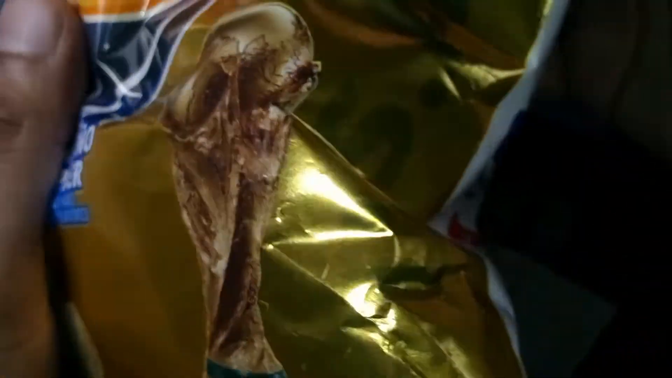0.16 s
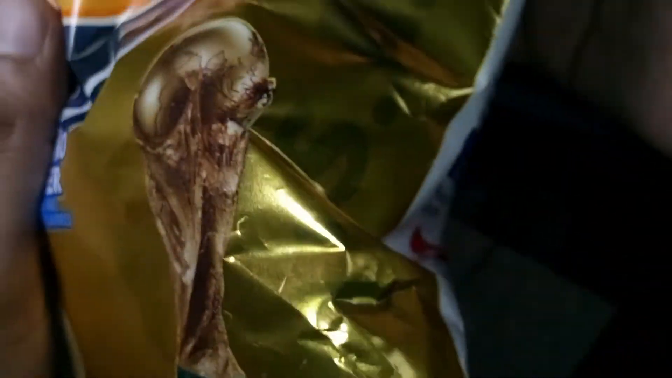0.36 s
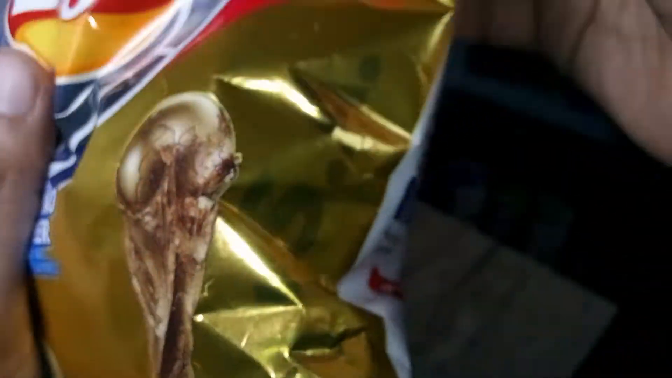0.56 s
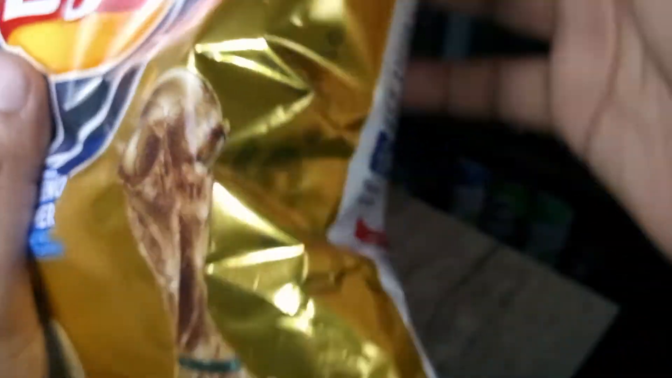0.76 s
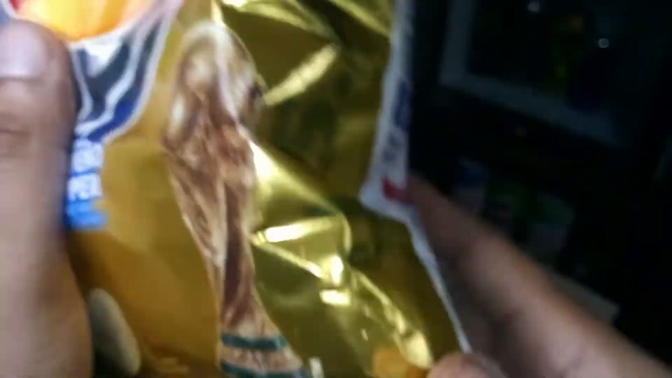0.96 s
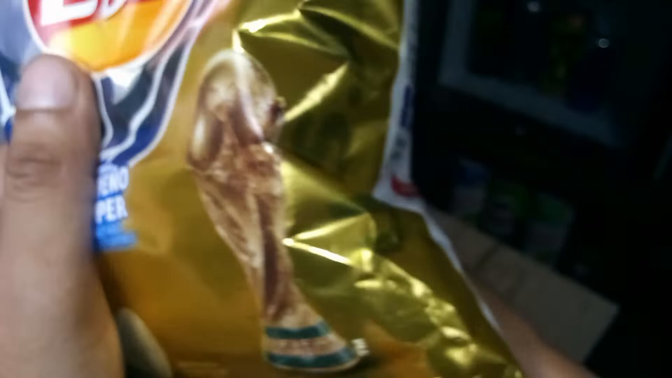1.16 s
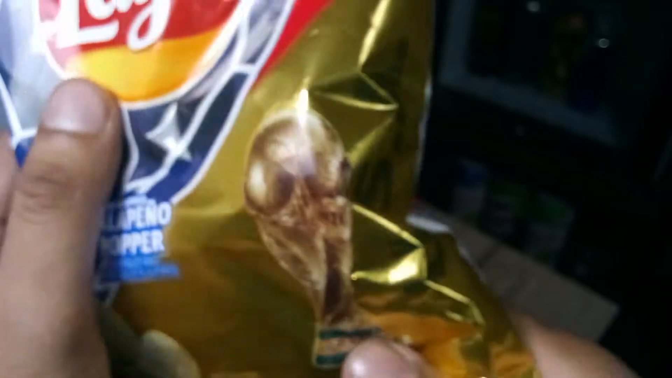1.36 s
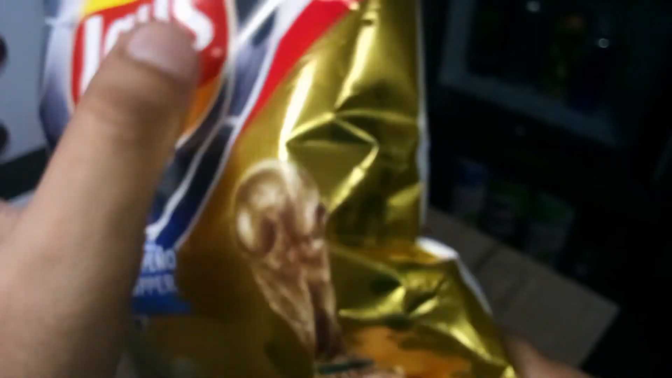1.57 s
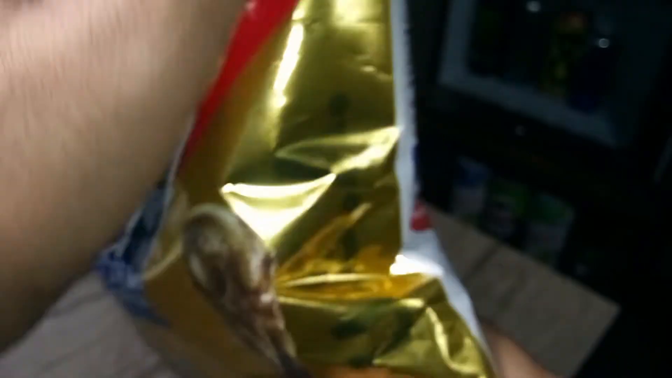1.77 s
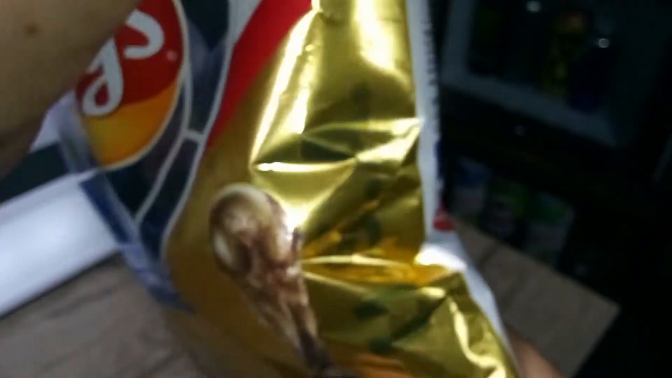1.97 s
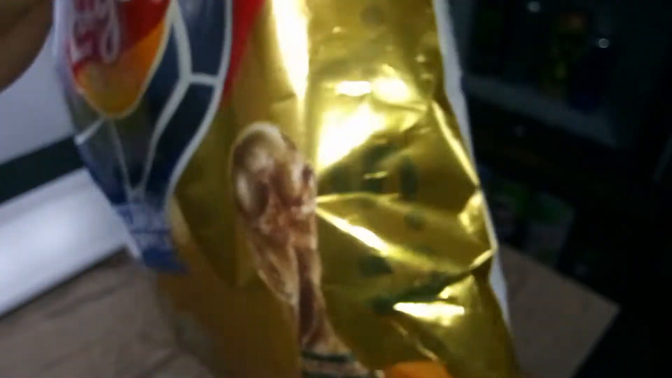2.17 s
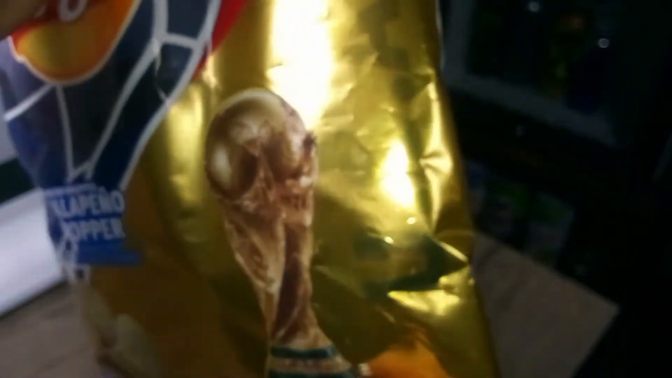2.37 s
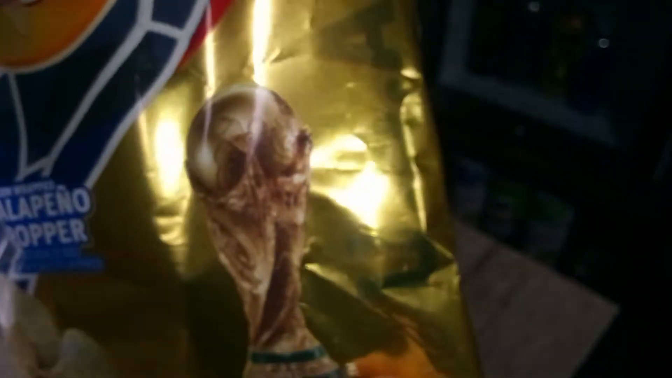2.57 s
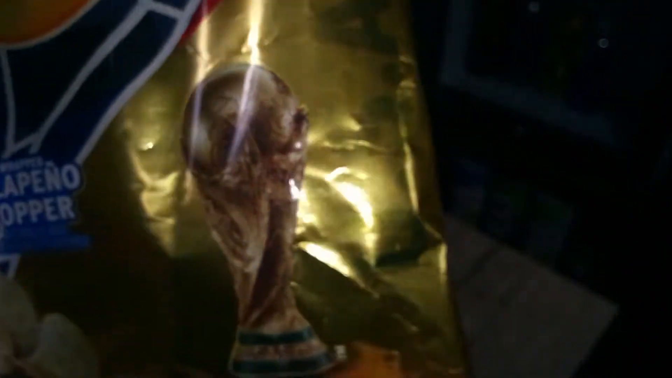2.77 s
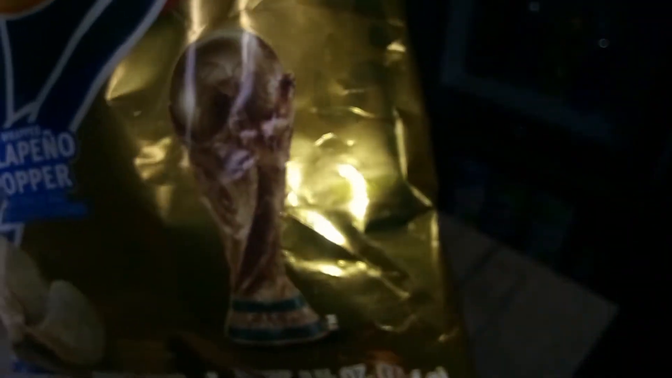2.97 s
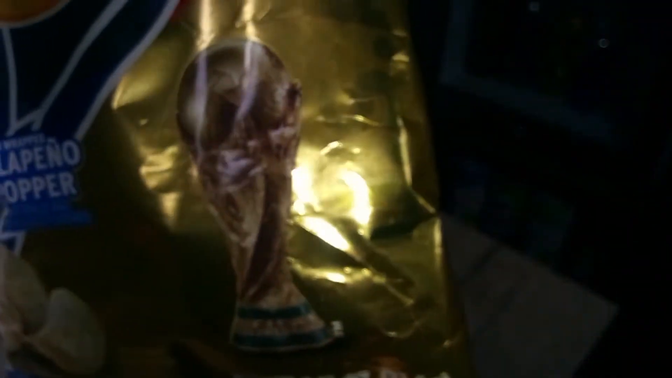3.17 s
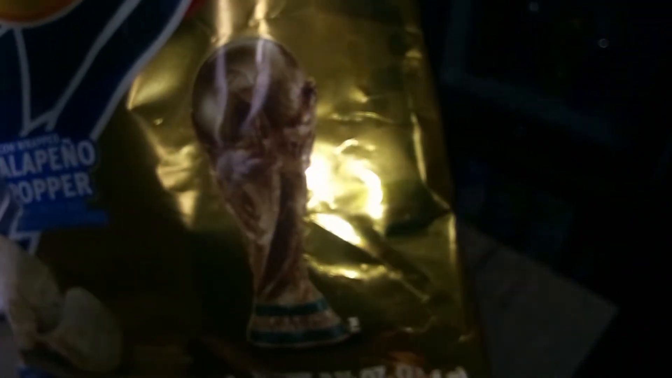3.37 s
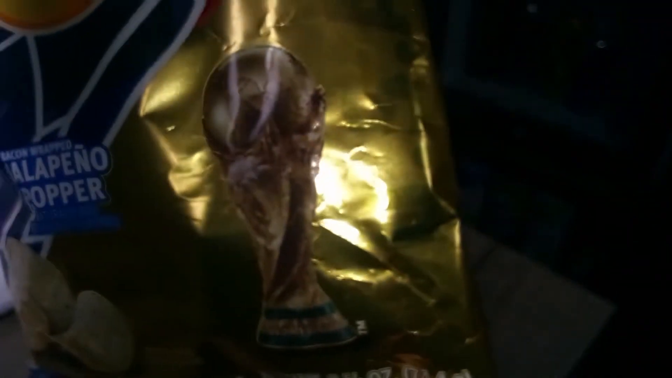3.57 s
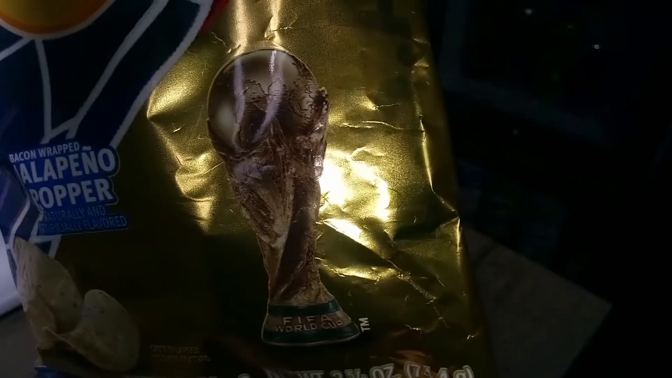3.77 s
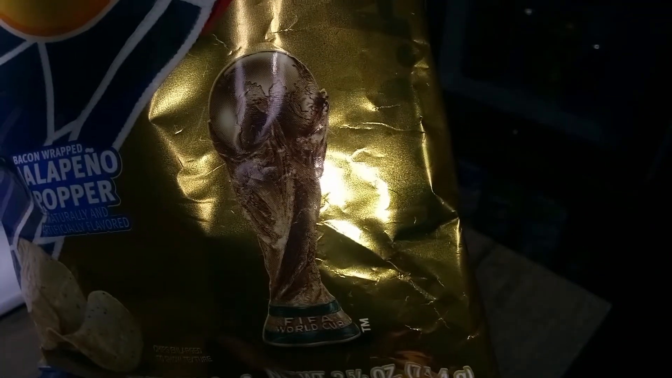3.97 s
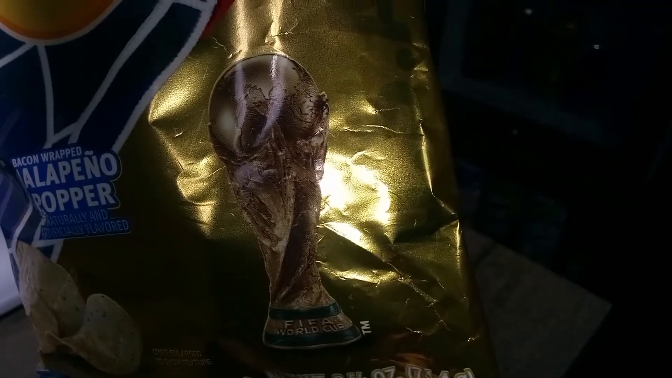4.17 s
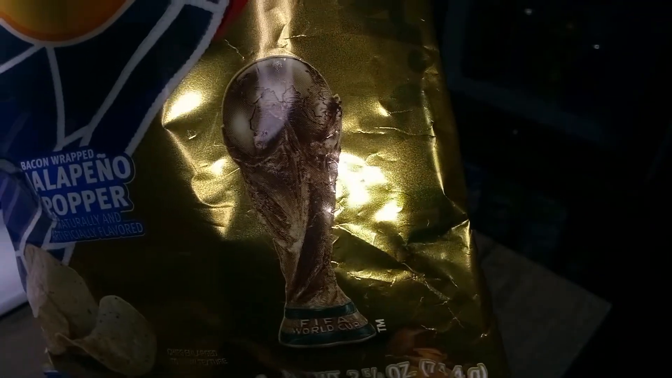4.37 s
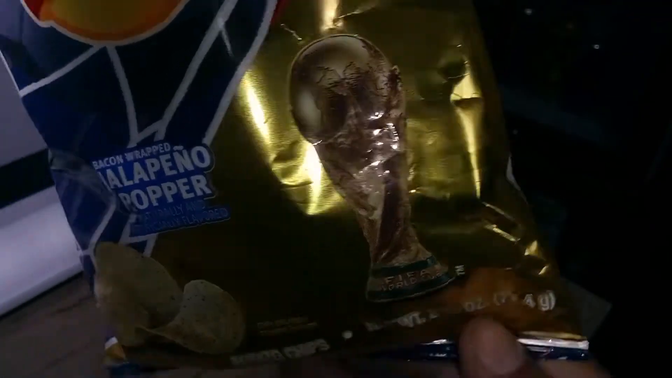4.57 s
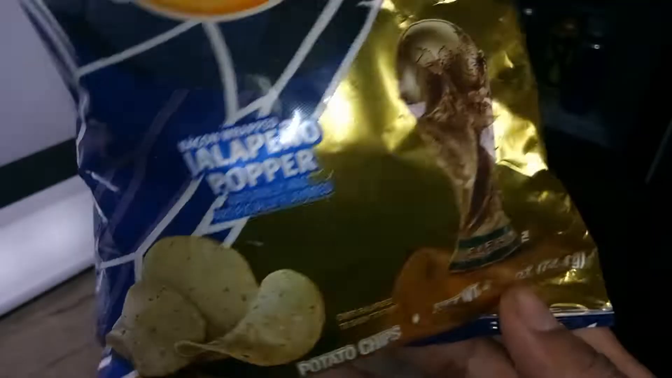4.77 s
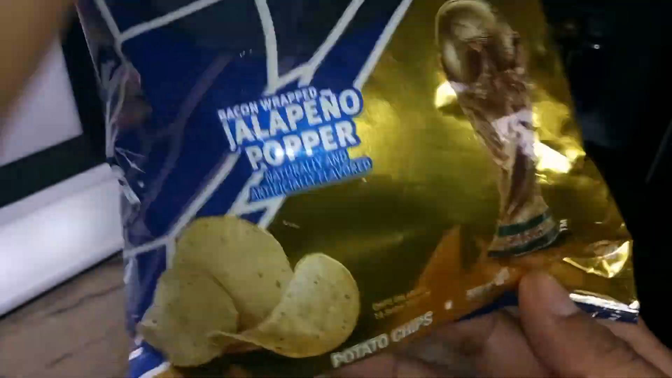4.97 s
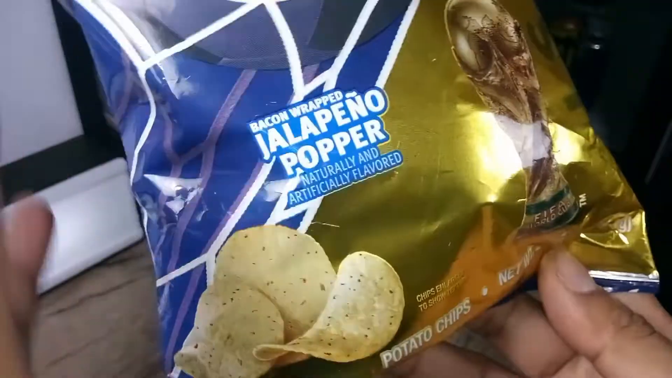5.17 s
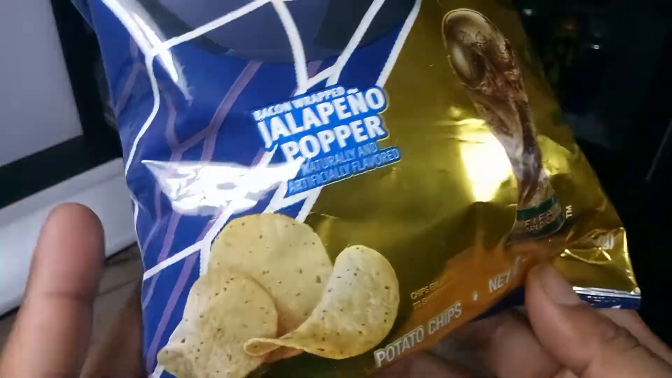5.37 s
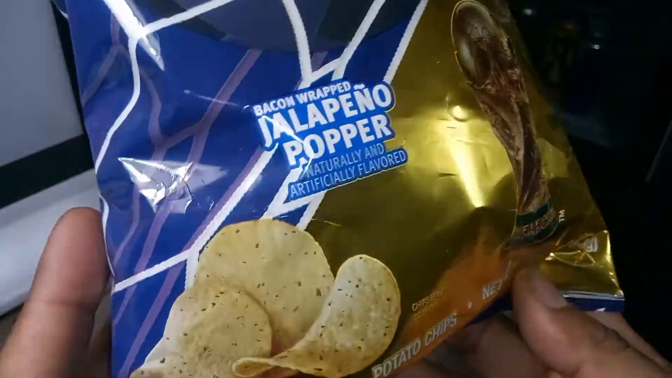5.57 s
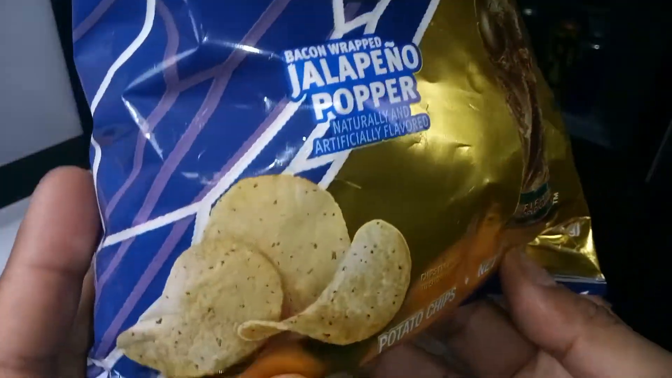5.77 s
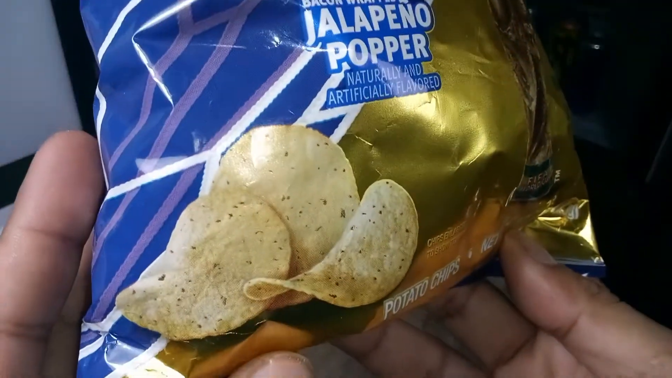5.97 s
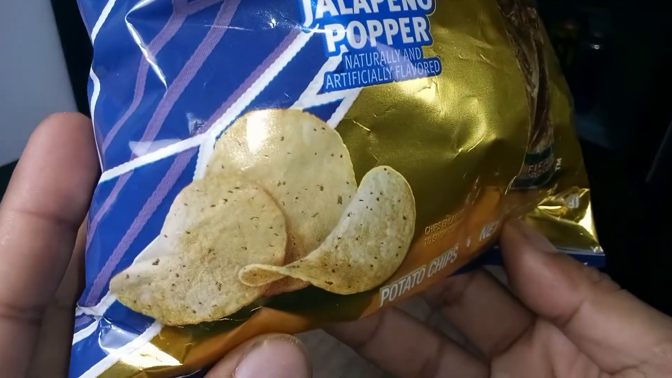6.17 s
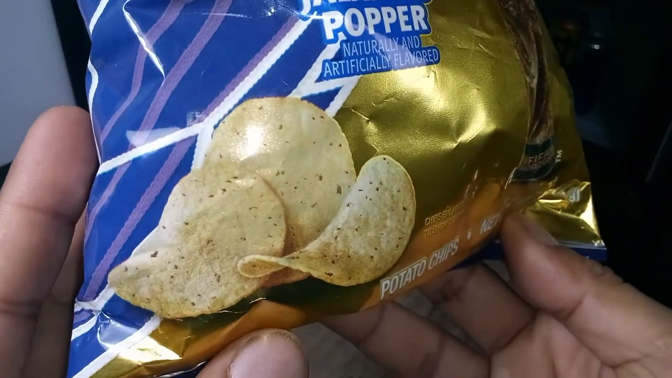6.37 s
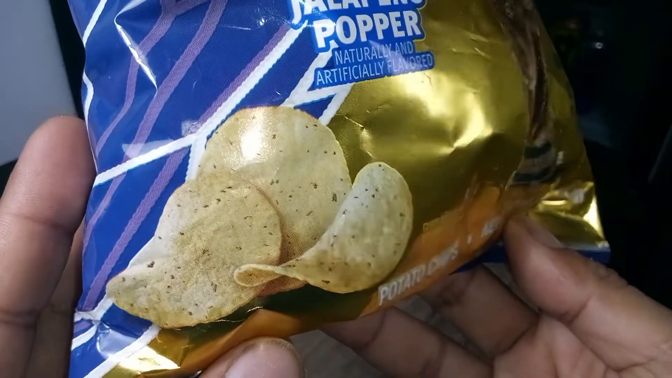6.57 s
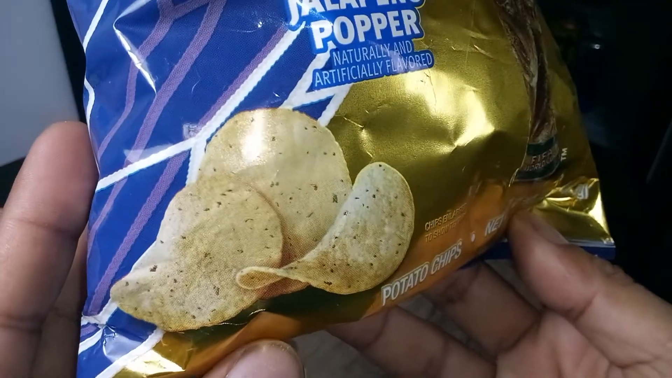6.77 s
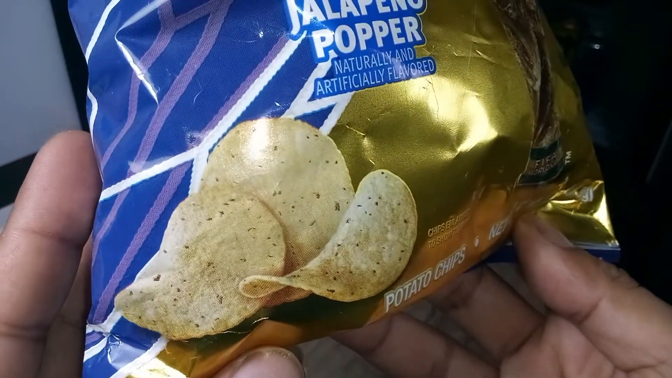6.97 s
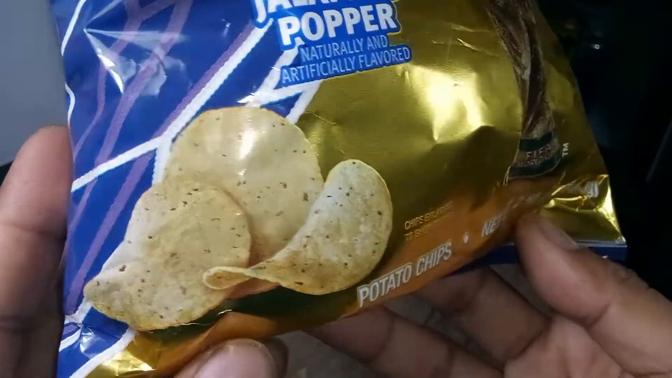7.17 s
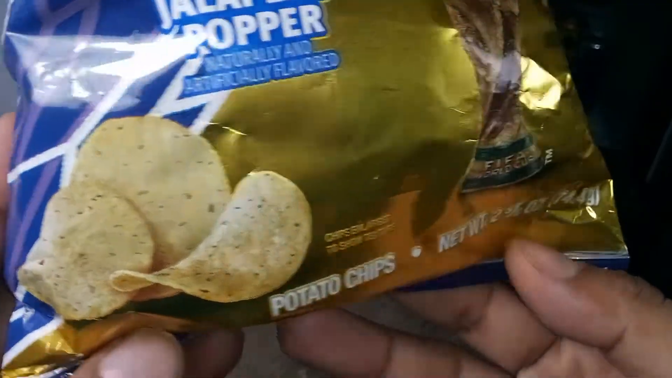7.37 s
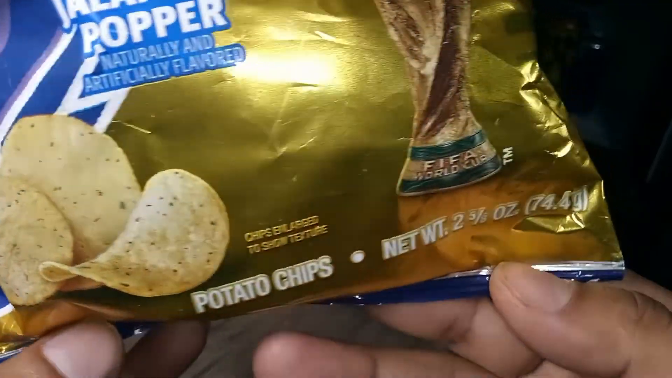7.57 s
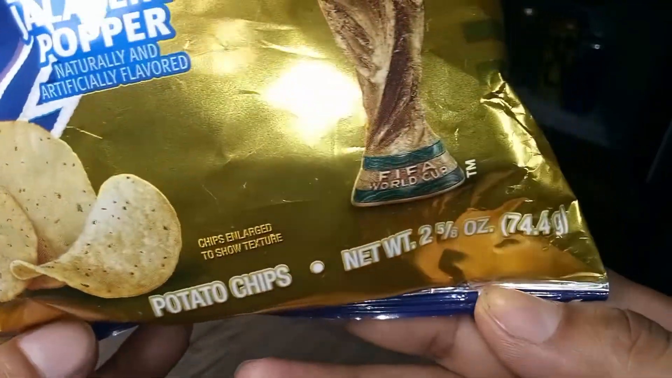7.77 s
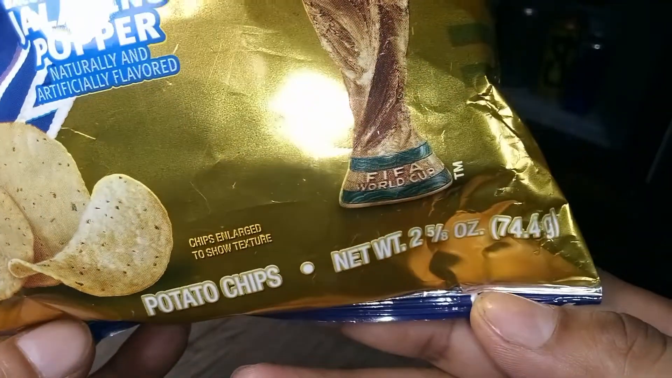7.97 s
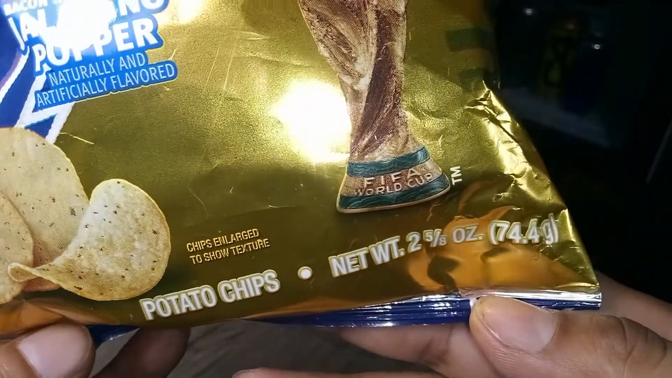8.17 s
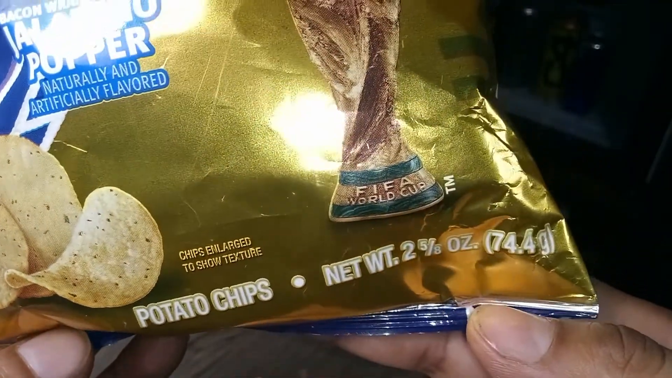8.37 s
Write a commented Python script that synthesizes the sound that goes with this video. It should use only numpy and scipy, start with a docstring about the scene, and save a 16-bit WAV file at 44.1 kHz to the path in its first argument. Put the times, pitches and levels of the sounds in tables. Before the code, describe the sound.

Close, crisp crinkling of a stiff foil packet being turned over, with sharp snaps and hollow pops, broken by near-silent gaps with low room hum.

```python
"""Foil-lined snack bag in the hands

A snack bag is turned over close to the microphone in a small quiet room. Creases snap as noise impulses
ringing through resonators; random small buckles and rubbing make the crackle, panel flexing and air thuds.
The air cavity and short reflections colour them, and between bursts a low hum and thin whine remain."""
import sys
import numpy as np
from scipy import signal
from scipy.fft import rfft, irfft
from scipy.io import wavfile
from scipy.ndimage import uniform_filter1d

SR = 44100
rng = np.random.default_rng(int(sys.argv[2]) if len(sys.argv) > 2 else 0)


def master(y):
    """Save y as 16-bit WAV."""
    cut = np.clip(np.atleast_2d(y).T, -1, 1)
    pcm = np.round(cut * 32767)  # scale
    wavfile.write(sys.argv[1], SR, pcm.astype(np.int16))


N = 370881
TIME = np.arange(N) / SR


def from_db(db):
    """Decibels to amplitude gain: 20 dB is a factor of ten."""
    return 10 ** (np.asarray(db) / 20)


def rms_one(x):
    """Normalise the effective (root-mean-square) amplitude to 1."""
    return x / np.sqrt(np.mean(x ** 2) + 1e-20)


def at_hz(points, hz):
    """Interpolate a table on a logarithmic frequency axis."""
    known_hz, values = np.transpose(points)
    return np.interp(np.log(np.maximum(hz, 1)), np.log(known_hz), values)


def drift(per_s):
    """Slow random modulation: a new normal value per_s times a second, joined by straight lines."""
    values = rng.standard_normal(2000)
    return np.interp(TIME * per_s, np.arange(len(values)), values)


def resonate(x, hz, q):
    """Two-pole resonance with gain 1 at its centre; a higher q rings longer."""
    w = 2 * np.pi * min(hz, SR / 2 - 1000) / SR
    damping = np.sin(w) / (2 * q)
    numerator = [damping, 0, -damping]
    denominator = [1 + damping, -2 * np.cos(w), 1 - damping]
    return signal.lfilter(numerator, denominator, x + 1e-18)


def colour(x, points):
    """Minimum-phase filtering: folding the cepstrum makes a causal filter of the given response."""
    size = 8192
    bins_hz = np.arange(size // 2 + 1) * SR / size
    cepstrum = irfft(np.log(from_db(at_hz(points, bins_hz))))
    cepstrum[1:size // 2] *= 2
    cepstrum[size // 2 + 1:] = 0
    impulse_response = irfft(np.exp(rfft(cepstrum)))
    return signal.fftconvolve(x, impulse_response)[:N]


def snaps(rows, q):
    """Snap-through buckling: a crease flips, rings its facet and leaves the film shivering."""
    swell_s, swell_db = 0.0029, -25
    shiver_s, shiver_db = 0.017, -28
    edge_db, wall_db = -17, -8
    lead = SR // 200   # samples before the flip
    t = TIME[:SR // 25] - lead / SR
    distance_s = np.abs(t)
    out = np.zeros(N + len(t))
    for s, level_db, hz, flip_s in rows:
        # a hard first crack, then the rest of the flip, then the shiver
        crack = np.exp(-distance_s / (0.12 * flip_s))
        flip = np.exp(-distance_s / flip_s)
        shiver = from_db(shiver_db) * np.exp(-distance_s / shiver_s)
        rise = 1 - np.exp(-4 * distance_s / flip_s)
        # a faint noise swells before the flip and fades after it
        swell = from_db(swell_db) * np.exp(-distance_s / swell_s)
        envelope = swell + (t > 0) * rise * (crack + flip + shiver)
        force = rng.standard_normal(len(t)) * envelope
        ring = rms_one(resonate(resonate(force, hz, q), hz, q))
        # the sharper the tuning, the less broadband edge
        snap = ring + from_db(edge_db) / (1 + q * q) * rms_one(force)
        # the far wall of the bag echoes it, from a different distance each time
        lag = int(SR * rng.uniform(.0005, .0022))
        echo = np.pad(snap, (lag, 0))[:len(t)]
        snap = rms_one(snap + from_db(wall_db) * echo)
        start = max(round(s * SR) - lead, 0)
        # the level counts all the energy as if within one millisecond
        out[start:start + len(t)] += from_db(level_db) * snap * np.sqrt(SR / 1000 / len(t))
    return out[:N]


def lesser_snaps(wrinkle_db):
    """Random point process: smaller creases give way oftener and louder under a firm grip."""
    firmest_per_s, rate_follows = 45, 0.33   # rate under the firmest grip; share of the grip's dB it follows
    firmest_db, level_follows, spread_db = -26.5, 0.75, 4   # likewise for level, with its scatter
    centre_hz, spread_octaves, flip_s = 2400, .8, 0.00062
    slots = np.arange(0, N, SR // 200)
    chance = rng.random(len(slots))
    size, pitch = rng.standard_normal((len(slots), 2)).clip(-2, 2).T
    grip_db = wrinkle_db[slots] - wrinkle_db.max()
    per_s = firmest_per_s * from_db(rate_follows * grip_db)
    level_db = firmest_db + level_follows * grip_db + spread_db * size
    ring_hz = centre_hz * 2 ** (spread_octaves * pitch)
    rows = np.transpose([TIME[slots], level_db, ring_hz, np.full(len(slots), flip_s)])
    return rows[chance < per_s * TIME[slots[1]]]


def creases(wrinkle_db):
    """Impulsive radiation of buckling creases; q sets how clearly each kind rings."""
    # single crease snaps, from loud cracks to faint ticks:
    # start_s, level_db (over one millisecond), ring_hz, flip_s
    crease_snaps = [(0.0422, -24.5, 1420, 0.00074), (0.162, -27, 1000, 0.00032), (0.2535, -24, 1340, .002),
                    (0.3508, -31, 1340, 0.0005), (0.4319, -17, 1510, .0005), (0.5092, -21, 3275, 0.0011),
                    (0.5277, -26.5, 1340, 0.00045), (0.607, -17.5, 840, 0.0016),
                    (0.6343, -19, 2410, 0.0013), (0.6491, -20.5, 1510, 0.0013), (0.7354, -22, 1060, 0.0012),
                    (0.7916, -27.5, 710, .003), (0.8225, -25.5, 3420, 0.00075), (0.8443, -28, 3220, 0.0021),
                    (0.9035, -41, 2020, 0.00056), (0.9798, -25, 2710, 0.00094), (1.0078, -25.5, 500, .0005),
                    (1.049, -22.5, 3620, 0.0025), (1.095, -22, 9000, 0.00062), (1.118, -20.5, 710, 0.0018),
                    (1.1693, -19.5, 1000, 0.0031), (1.248, -28, 1700, 0.0012), (1.2824, -24, 950, 0.0042),
                    (1.409, -21.5, 2270, 0.0009), (1.426, -20, 2550, 0.00024), (1.5227, -20, 440, .001),
                    (1.6268, -23.5, 950, 0.0021), (1.6428, -18.5, 1060, 0.002), (1.7066, -23, 2140, 0.0013),
                    (1.8155, -27, 1130, 0.0016), (1.9435, -21.5, 840, .0012), (2.1567, -22, 350, 0.00092),
                    (2.2002, -24.5, 6890, 0.00031), (2.2865, -18, 1420, 0.0015),
                    (2.3578, -31.5, 5460, .0014), (2.3829, -29.5, 630, .0008),
                    (2.4294, -24.5, 1800, 0.0021), (2.453, -25, 2410, 0.00055), (2.6102, -46, 630, 0.00082),
                    (2.7478, -27.5, 1910, 0.0026), (2.9008, -22.5, 2710, 0.00077),
                    (2.9093, -28.5, 6890, 0.00042), (2.9424, -27.5, 11000, 0.00036),
                    (2.978, -24.5, 3840, 0.00062), (3.0056, -22.5, 5150, .0005),
                    (3.012, -33.5, 8210, .0003), (3.1132, -52, 3620, .0007), (4.2155, -48, 1340, 0.0031),
                    (4.3102, -32, 6500, .0023), (4.4935, -24.5, 3040, 0.00058),
                    (4.5542, -27.5, 2710, 0.00066), (4.5762, -23, 3220, 0.00078),
                    (4.5985, -22, 2410, 0.00022), (4.6437, -21, 590, 0.00059), (4.7272, -22, 2410, 0.00071),
                    (4.7879, -24.5, 1340, 0.0012), (4.807, -32.5, 2870, 0.00027),
                    (4.8312, -28, 3040, .0009), (4.8512, -16, 2870, 0.00032), (5.0135, -20.5, 1130, .0013),
                    (5.0452, -20.5, 4200, 0.00052), (5.07, -18.5, 2550, 0.00071),
                    (5.1088, -27, 6500, 0.0012), (5.141, -28.5, 1510, 0.0012), (5.2072, -40.5, 1510, .0025),
                    (5.345, -26, 1700, 0.0039), (5.3549, -27, 890, 0.0015), (5.4323, -24.5, 1700, .002),
                    (5.533, -29, 2140, .001), (5.5737, -27.5, 2550, .0014), (5.6072, -36, 2270, .0008),
                    (5.7351, -29.5, 2550, 0.0022), (5.8406, -51, 2547, 0.00049),
                    (5.9232, -39, 2550, 0.0021), (6.044, -56, 6490, .0005), (7.3199, -27.5, 1000, .0004),
                    (7.4463, -35.5, 2870, 0.0018), (7.4833, -29, 4850, 0.0014),
                    (7.5079, -31.5, 950, 0.0026), (7.9764, -52, 630, .0036), (8.0371, -39, 1000, 0.0021),
                    (8.085, -34, 1800, 0.0024), (8.2876, -35, 6130, 0.0012)]
    # taut panels popping through with a clear pitch: start_s, level_db (over one millisecond), ring_hz, flip_s
    taut_panels = [(0.5655, -20.5, 3420, .0004), (1.9151, -23.5, 820, 0.00089),
                   (2.2339, -21, 752.8, 0.00063), (2.3083, -18, 764, 0.0012), (2.4816, -32.5, 1840, 0.0026),
                   (2.7162, -29, 366, 0.0045), (2.8257, -24, 1190, 0.0029), (2.8519, -27, 5460, 0.00052),
                   (3.8884, -33.5, 3260, 0.00056), (4.472, -26.5, 4590, .0004), (5.3936, -30, 630, .001),
                   (6.0088, -42.5, 2109, 0.0015), (7.2625, -34.5, 560.3, 0.0032),
                   (7.2765, -39, 590, 0.0026), (7.82, -29, 2893, 0.00022), (7.8326, -30, 1256, 0.0019),
                   (7.8953, -49.5, 1340, 0.00093), (7.9172, -43.5, 674, 0.0038),
                   (8.3747, -47, 840, 0.00087)]
    return snaps(crease_snaps, q=.19) + snaps(taut_panels, q=1.2) + snaps(lesser_snaps(wrinkle_db), q=0.65)


def grains(level_db, spectrum, per_s, spread_db, rub_db, q, reach, even_s, count):
    """Shot-noise excitation of resonators: random buckles ring facets over the smooth rub of film."""
    swing_db, changes_per_s = 4, 35   # wandering of each facet's gain
    bending_delay_s = .002   # longest way across the film, at 1 kHz
    rate = per_s * from_db(.2 * (level_db + 42))   # per_s holds at -42 dB
    born = np.flatnonzero(rng.random(N) < rate / SR)
    sizes = from_db(spread_db * np.minimum(rng.exponential(1, len(born)), 4))
    # light handling only slides the film; it takes some force to buckle it
    sizes = sizes / (1 + from_db(-.45 * (level_db[born] + 66.5)))
    pitches = np.geomspace(spectrum[0][0], spectrum[-1][0], count)
    facet = rng.uniform(-1, count, len(born))
    travel_s = bending_delay_s * rng.random(len(born))
    out = np.zeros(N)
    for k, hz in enumerate(pitches):
        # bending waves cross the film more slowly the lower they are
        delay = (SR * travel_s * np.sqrt(1000 / hz)).astype(int)
        arrive = np.minimum(born + delay, N - 1)
        # a buckle also shakes the facets of neighbouring size
        coupling = 1 / (1 + ((k - facet) / reach) ** 2)
        clicks = np.zeros(N)
        clicks[arrive] = sizes * rng.standard_normal(len(born)) * coupling
        force = rms_one(clicks) + from_db(rub_db) * rng.standard_normal(N)
        # facets come and go as the bag changes shape
        gain = from_db(at_hz(spectrum, hz) + swing_db * drift(changes_per_s))
        out += gain * rms_one(resonate(resonate(force, hz, q), hz, q))
    # the hands feed in energy at a steady pace, however it is shared among the buckles
    power = uniform_filter1d(out ** 2, max(int(even_s * SR), 2))
    return from_db(level_db) * out / np.sqrt(np.abs(power) + .003 * np.mean(out ** 2))


def wrinkles(level_db):
    """Crackling noise: dense buckling of tiny facets, which ring high."""
    # relative strength of the wrinkle facets: pitch_hz, level_db (per band)
    wrinkle_colour = [(1300, -5.5), (2000, 0.5), (2800, 0.5), (4200, 1), (6300, 2.5), (9500, -1),
                      (15000, -6)]
    return grains(level_db, wrinkle_colour, per_s=600, spread_db=1.5, rub_db=-3.0, q=5.0, reach=5.2,
                  even_s=0.042, count=18)


def panels(level_db):
    """Plate flexure: the wide panels ring lower and buckle less often."""
    # relative strength of the panel resonances: pitch_hz, level_db (per band)
    panel_colour = [(400, -5), (560, 3), (740, -1), (950, -4), (1250, 0)]
    return grains(level_db, panel_colour, per_s=300, spread_db=2.5, rub_db=-12, q=5.0, reach=1.8,
                  even_s=0.075, count=10)


def body(level_db):
    """Low, broad resonances: the air inside thuds softly."""
    # relative strength of the thud resonances: pitch_hz, level_db (per band)
    body_colour = [(75, -5), (110, -0.5), (200, 0.5), (360, 5.5)]
    return grains(level_db, body_colour, per_s=200, spread_db=3.5, rub_db=-18.0, q=3.0, reach=2.0,
                  even_s=0.11, count=8)


def handling():
    """Driving envelope of crackle, flexing and thuds in dB: straight dB slopes are exponential in amplitude."""
    # the fingers squeeze or shift the bag: start_s, hold_s, wrinkle_db, panel_db, body_db
    squeezes = [(0.0, 0.076, -51, -51, -57.5), (0.15, 0.072, -44, -46, -45), (0.25, 0.011, -38, -38, -39),
                (0.298, 0.082, -50.5, -50, -57.5), (0.386, 0.09, -33, -37, -35),
                (0.486, 0.17, -36, -43, -39.5), (0.678, 0.092, -43, -44, -49),
                (0.83, .06, -48.5, -56, -65.5), (0.975, 0.18, -44, -47, -49), (1.158, 0.031, -41, -44, -40),
                (1.28, .03, -37, -40.5, -61), (1.355, 0.071, -37, -41, -54), (1.47, 0.096, -34, -37, -37),
                (1.589, 0.064, -42.5, -44, -53.5), (1.695, .02, -36, -42, -45),
                (1.813, 0.081, -42, -45, -46), (1.911, 0.099, -36.5, -42, -43.5),
                (2.019, .15, -34, -39, -35), (2.24, 0.08, -37.5, -42, -37.5),
                (2.36, 0.08, -48, -51.5, -64.5), (2.542, .11, -63, -65.5, -62),
                (2.739, 0.032, -49.5, -51.5, -44.5), (2.83, .1, -45, -53.5, -56),
                (2.969, .07, -47.5, -60, -64), (3.217, .26, -76, -80, -72.5),
                (4.289, 0.019, -52.5, -61, -65.5), (4.495, 0.046, -50, -53.5, -62),
                (4.569, 0.093, -42, -48, -57), (4.666, 0.047, -35.5, -41.5, -43),
                (4.763, 0.25, -44, -49, -62), (5.007, 0.015, -42, -44, -53), (5.075, .02, -34, -38.5, -41),
                (5.11, .04, -39.5, -46, -50), (5.282, .04, -66, -72, -73), (5.349, .02, -45.5, -46, -61.5),
                (5.39, .05, -52, -53, -58.5), (5.526, 0.1, -44.5, -51.5, -64),
                (5.731, 0.022, -53.5, -66.5, -72.5), (5.792, .06, -67, -71.5, -75.5),
                (5.929, 0.12, -62.5, -75.5, -75.5), (6.139, .02, -69.5, -74, -74),
                (7.099, 0.17, -76.5, -76, -71.5), (7.265, 0.061, -57.5, -56.5, -67.5),
                (7.34, 0.033, -49, -52.5, -59.5), (7.438, 0.084, -51, -60.5, -64.5),
                (7.593, .02, -60, -68.5, -69), (7.814, 0.022, -58, -58.5, -66),
                (8.032, 0.061, -63, -65, -74.5), (8.292, 0.014, -65.5, -76.5, -72.5)]
    # the grip bites fast, eases while held, lets go
    attack_db_per_s, sag_db_per_s, release_db_per_s = 1398.5, 15, 303
    # the film stirs faintly before and after each squeeze
    settle_db, settle_db_per_s = -22, 128
    resting_db = -88.0   # the bag merely held
    t = TIME[::44]
    levels = np.full((3, len(t)), resting_db)
    for start, hold, *strength_db in squeezes:
        before = np.maximum(start - t, 0)
        after = np.maximum(t - start - hold, 0)
        sag = sag_db_per_s * np.clip(t - start, 0, hold)
        grip = -attack_db_per_s * before - release_db_per_s * after
        settle = settle_db - release_db_per_s * before - settle_db_per_s * after
        squeeze = np.array(strength_db)[:, None] + np.maximum(grip, settle) - sag
        levels = np.maximum(levels, squeeze)
    return [np.interp(TIME, t, level) for level in levels]


def cavity(x):
    """Cavity resonance: the air in the bag favours a few pitches."""
    # hollow of the bag: pitch_hz, width_hz, lift_db
    modes = [(736, 110, 6.5), (2760, 41, 1.5)]
    return x + sum((from_db(lift_db) - 1) * resonate(x, hz, hz / width) for hz, width, lift_db in modes)


def room(x):
    """Reverberation: reflections from the desk and near walls, dying sooner in the treble."""
    # room decay: band_hz, t60_s (time to fall 60 dB)
    decay_times = [(150, 0.11), (1000, 0.14), (3000, 0.099), (7000, 0.055), (15000, 0.015)]
    wet_db, onset_s = -14.5, 0.0033
    t = TIME[:SR // 3]
    edges = np.geomspace(60, 18000, 9)
    tail = 0
    for low, high in zip(edges, edges[1:]):
        band_pass = signal.butter(2, [low, high], "band", fs=SR, output="sos")
        band = signal.sosfilt(band_pass, rng.standard_normal(len(t)))
        t60_s = at_hz(decay_times, np.sqrt(low * high))
        tail = tail + band * from_db(-60 * t / t60_s)
    tail = tail * (1 - np.exp(-t / onset_s))
    tail = tail / np.sqrt(np.sum(tail ** 2))   # unit energy
    return x + from_db(wet_db) * signal.fftconvolve(x, tail)[:N]


def background():
    """Stationary filtered noise: low room hum and hiss with a faint, narrow electrical whine."""
    # relative spectrum of hum and hiss: frequency_hz, level_db (per Hz)
    floor_colour = [(25, -16), (50, -11.5), (85, 7), (125, -4), (180, 3), (380, -7), (600, -17.5),
                    (1500, -24.5), (6300, -31), (8500, -43), (16000, -36.5)]
    floor_db = -66.5
    whine_hz, whine_width_hz, whine_db = 14449, 21, -82
    hum = rms_one(colour(rng.standard_normal(N), floor_colour))
    q = whine_hz / whine_width_hz
    whine = rms_one(resonate(resonate(rng.standard_normal(N), whine_hz, q), whine_hz, q))
    return from_db(floor_db) * hum + from_db(whine_db) * whine


def scene():
    """Superposition: snaps, crackle, flexing and thuds add in the room, over the background."""
    # microphone response: frequency_hz, gain_db
    microphone = [(30, 1.5), (70, -2.5), (6300, 1), (8200, -8), (13300, -2), (14400, -6), (15000, 13.5),
                  (15650, 1.5), (16000, -13.5)]
    wrinkle_db, panel_db, body_db = handling()
    film = creases(wrinkle_db) + wrinkles(wrinkle_db) + panels(panel_db)
    bag = room(cavity(film) + body(body_db))
    return (colour(bag, microphone) + background())[None]


def record(dry):
    """Band limitation: a steep elliptic low-pass removes the top."""
    cutoff_hz = 16500
    low_pass = signal.ellip(10, .1, 80, cutoff_hz, fs=SR, output="sos")
    return signal.sosfilt(low_pass, dry)


dry = scene()
out = record(dry)
master(out)
```